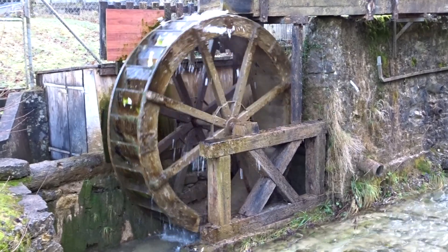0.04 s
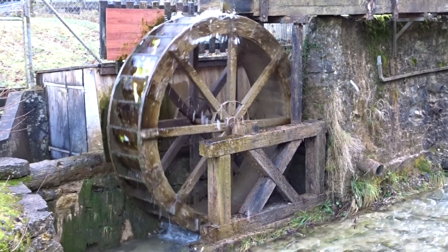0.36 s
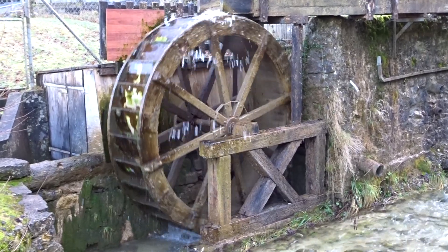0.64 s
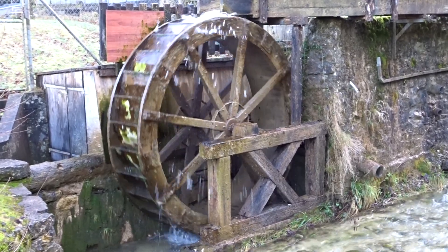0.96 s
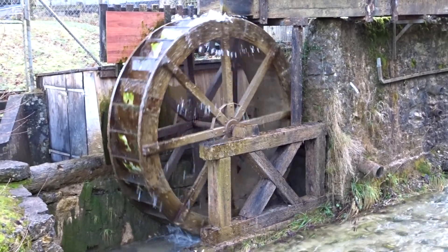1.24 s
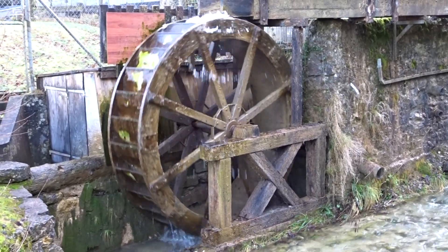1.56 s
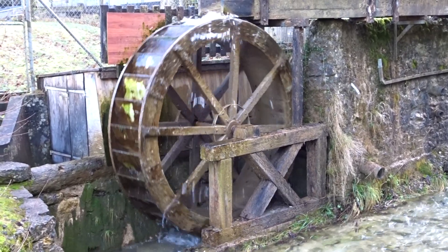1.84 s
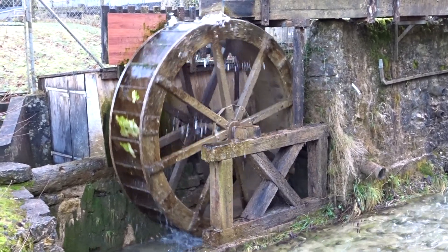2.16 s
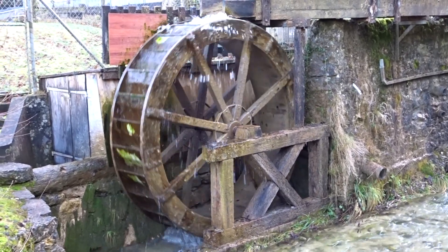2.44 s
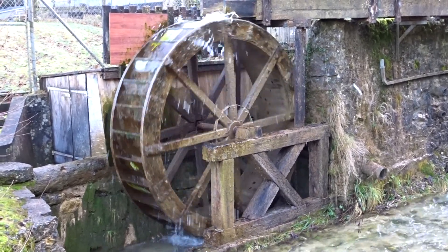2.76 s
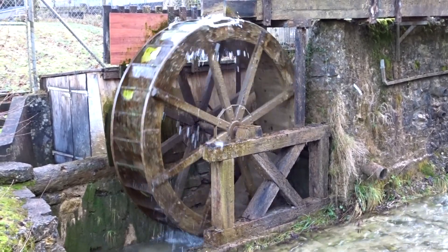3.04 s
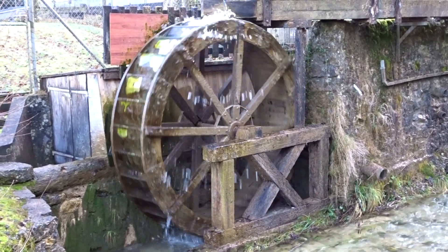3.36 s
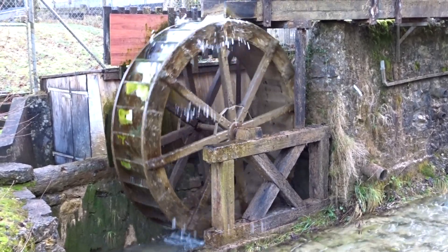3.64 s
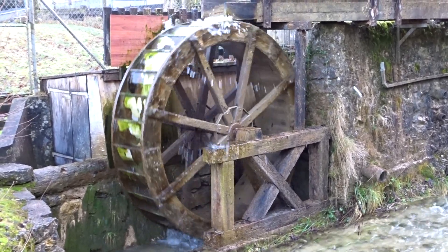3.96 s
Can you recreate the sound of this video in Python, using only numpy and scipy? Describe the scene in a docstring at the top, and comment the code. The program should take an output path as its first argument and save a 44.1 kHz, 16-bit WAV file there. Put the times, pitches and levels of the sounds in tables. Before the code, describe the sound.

A waterwheel spills water in quick, repeated splashes while a stream rushes and gurgles.

```python
"""A stream rushes steadily from the start, gurgling under a wooden waterwheel beside a stone wall.
About 4.6 times a second a bucket spills and a clump of drops spatters down, the largest
slapping on wet wood and stone or plopping as the air they trap resonates.
After each splash the wall and the wheel pit return a short echo.
Between spills, runoff patters on and stray drops plink into the pool."""
import sys
import numpy as np
from scipy import signal
from scipy.fft import rfft, irfft
from scipy.io import wavfile
from scipy.ndimage import uniform_filter1d

SR = 44100
rng = np.random.default_rng(int(sys.argv[2]) if len(sys.argv) > 2 else 0)


def unload_wav(signal):
    """Save mono or channel-first audio to the path in sys.argv[1] as 16-bit WAV at rate SR, clipped to [-1, 1]."""
    wavfile.write(
        sys.argv[1],
        SR,
        np.round(np.clip(np.atleast_2d(signal).T, -1, 1) * 32767).astype(np.int16),
    )


N = 176400

# spectrum of drop impacts: frequency_hz, gain_db
SPATTER_SPECTRUM = [(150, -29), (400, -11.5), (800, -1.5), (1600, -0.5), (2500, 1.5), (4000, -2),
                    (5500, 1.5), (7500, -3), (10000, -5), (12500, -8), (14000, -5.5), (16000, -10.5)]
STEREO_SCATTER = 0.39  # side amplitude relative to middle


def spills(gain_db=-3, release_s=0.018, plink_share=0.35, split_hz=4400):
    """Incoherent addition: each bucket's load lands as clicks and plinks whose powers sum."""
    # clumps of water, one or two per bucket: start_s, rise_s, hold_s, level_db, extra_treble_db
    clumps = [(0.095, 0.0097, .004, -17, -6), (0.271, 0.052, 0.011, -24.5, 1),
              (0.505, 0.016, 0.035, -25.5, -2), (0.72, 0.0048, 0.029, -22.5, -5),
              (0.975, 0.0065, 0.01, -19.5, 1), (1.157, 0.012, 0.041, -30, 6.5),
              (1.43, 0.014, 0.011, -27, 0), (1.490, .015, .006, -30, 4), (1.623, 0.013, 0.0072, -23, 3),
              (1.65, 0.0055, .004, -22.5, -4), (1.805, 0.0092, 0.03, -26, 0.5),
              (2.045, 0.0049, 0.0057, -31, 8), (2.064, 0.0034, 0.0048, -18.5, -2),
              (2.246, 0.024, 0.0097, -27.5, 7), (2.322, .015, .005, -34, 5),
              (2.493, 0.013, 0.011, -27.5, 9), (2.538, .005, .010, -29.5, 6.5),
              (2.68, .006, 0.016, -31.5, 7), (2.92, .004, .004, -33, 8.5), (2.934, .003, 0.0046, -21, 4.5),
              (3.127, 0.046, .008, -27.5, 3.5), (3.349, .002, 0.013, -28.5, 4),
              (3.377, .008, .010, -21.5, -1.5), (3.579, 0.021, 0.024, -21.5, -1.5),
              (3.779, .012, 0.032, -25, .5)]
    t, body_power, treble_power = np.arange(N) / SR, np.zeros(N), np.zeros(N)
    for start, rise, hold, level_db, extra_treble_db in clumps:
        attack = np.clip((t - start) / rise, 0, 1)
        envelope = attack * np.exp(-np.maximum(t - start - rise - hold, 0) / release_s)
        body_power += (amp(level_db) * envelope) ** 2
        treble_power += (amp(level_db + extra_treble_db) * envelope) ** 2
    clicks = unit(colour(impacts(per_s=5000, spread_db=2.5), SPATTER_SPECTRUM))
    spatter = np.sqrt(1 - plink_share) * clicks + np.sqrt(plink_share) * plinks(per_s=1800)
    treble = highpass(spatter, split_hz, order=1)
    return amp(gain_db) * (np.sqrt(body_power) * (spatter - treble) + np.sqrt(treble_power) * treble)


def slaps(gain_db=-1, crack_s=0.002, size=1024):
    """Impact excitation: a large drop rings a tiny bubble and cracks around the same pitch."""
    # large drops on wet wood and stone: start_s, level_db, pitch_hz, decay_cycles
    large_drops = [(.0938, -15, 5500, 2), (0.1018, -13, 4000, 2), (.1060, -11, 4000, 3.3),
                   (.2590, -22.5, 10000, 9), (.3085, -9.5, 7000, 4), (.3350, -13.5, 4750, 2.7),
                   (.7138, -11, 5800, 3), (0.7188, -13, 5400, 6), (0.729, -11, 5800, 2),
                   (.7350, -13, 3500, 3.4), (.7675, -15, 5600, 4), (0.974, -10.5, 3600, 3),
                   (1.1735, -8, 5960, 4), (1.4308, -12.5, 5170, 4.1), (1.6155, -14, 5300, 4),
                   (1.6405, -22, 3800, 2), (1.7263, -17, 6060, 4), (1.8098, -19, 5230, 3),
                   (1.8151, -11, 7500, 3), (1.8184, -5.5, 7600, 5.9), (1.8395, -12, 2360, 2.3),
                   (2.0695, -26, 2820, 2), (2.268, -16, 5770, 3), (2.2785, -26, 3100, 2),
                   (2.3430, -17, 3040, 2), (2.4580, -9.5, 3040, 1.1), (2.5062, -10, 2580, 1),
                   (2.9380, -16, 2400, 1.8), (3.0383, -21, 2800, 1.8), (3.1077, -13, 4700, 1.4),
                   (3.1982, -14, 2500, 1.7), (3.3513, -14.5, 4340, 3.5), (3.5932, -18, 3300, 2),
                   (3.7895, -6.5, 5200, 6.6), (3.7984, -14, 5500, 7)]
    t, out = np.arange(size) / SR, np.zeros((2, N))
    for start, level_db, hz, cycles in large_drops:
        band = bell_band(hz, size, octaves=0.83) + 0.1
        middle, side = unit(irfft(rfft(rng.standard_normal((2, size))) * band, size))
        ring = np.exp(-t * hz / cycles) * np.sin(2 * np.pi * hz * t)
        for channel, sign in zip(out, (1, -1)):
            crack = 0.34 * np.exp(-t / crack_s) * (middle + sign * STEREO_SCATTER * side)
            add(channel, start, amp(level_db + gain_db) * (ring + crack))
    return out


def plops(froth_s=0.013, size=2048):
    """Damped resonance: a larger air pocket knocks hollowly, then breaks into froth near its pitch."""
    # air trapped by falling water: start_s, level_db, pitch_hz
    air_pockets = [(0.1033, -13, 1450), (0.107, -15, 1190), (0.7138, -17, 1330), (0.7175, -23, 1650),
                   (0.7487, -19, 1430), (0.974, -16.5, 2100), (1.4345, -9.5, 1730), (1.4448, -19, 1610),
                   (1.6205, -15.5, 1800), (1.8390, -11.5, 1760), (2.0704, -15.5, 1760),
                   (2.2780, -14.5, 1500), (2.4594, -17.5, 1830), (2.507, -15.5, 1170),
                   (2.5185, -10.5, 1470), (2.9382, -11, 1850), (3.353, -21, 1620), (3.39, -16, 1900),
                   (3.8022, -19.5, 1850)]
    t, out = np.arange(size) / SR, np.zeros(N)
    for start, level_db, hz in air_pockets:
        band = bell_band(hz, size, octaves=0.24)
        froth = unit(irfft(rfft(rng.standard_normal(size)) * band, size)) * np.exp(-t / froth_s)
        knock = bubble(hz, swell_cycles=1.16, glide=0.027)
        add(out, start, amp(level_db) * (knock + 0.22 * froth))
    return out


def plinks(per_s, low_hz=1410, high_hz=10800, pitches=20):
    """Bubble resonance: each drop rings a tiny bubble at its own natural frequency."""
    out = np.zeros((2, N))
    for hz in np.geomspace(low_hz, high_hz, pitches):
        ring = bubble(hz, swell_cycles=0.95, glide=0.02) * hz ** 0.23  # higher plinks peak louder
        out += convolve(impacts(per_s / pitches, spread_db=5.5), ring)
    return unit(out)


def bubble(hz, swell_cycles, glide):
    """Damped oscillator: a pocket of air swells, rings for a few cycles and rises in pitch."""
    age = np.arange(2048) / SR * hz / swell_cycles  # 1 at the envelope's peak
    phase = 2 * np.pi * swell_cycles * age * (1 + glide * np.minimum(age, 10) / 2)
    return age * np.exp(1 - age) * np.sin(phase)


def drips(gain_db=-41.5):
    """Shot noise: water running off the rim and spokes merges into an unbroken patter."""
    return amp(gain_db) * unit(colour(impacts(per_s=4000, spread_db=2.5), SPATTER_SPECTRUM))


def strays(gain_db=-48.5):
    """Air entrainment: single drops fall into the pool throughout, each ringing a bubble."""
    return amp(gain_db) * plinks(per_s=500)


def echo(x, gain_db=-7.5, spacing=20):
    """Reverberation: sparse reflections from wall and pit decay, lasting longest in the midrange."""
    # reverberation time: frequency_hz, t60_s
    decay_times = [(300, 0.15), (1500, 0.49), (5000, 0.28), (14000, 0.23)]
    slots = np.arange(6 * spacing, SR // 2, spacing)
    arrivals = slots + rng.integers(0, spacing, (2, len(slots)))
    taps = np.zeros((2, SR))
    np.put_along_axis(taps, arrivals, rng.choice([-1., 1.], arrivals.shape), 1)
    hz, t, spectra = signal.stft(taps + 0.14 * taps[::-1], SR, nperseg=256)
    decay = amp(-60 * t / curve_at(decay_times, hz)[:, None])
    tail = signal.istft(spectra * decay, SR, nperseg=256)[1]
    return amp(gain_db) * signal.fftconvolve(x, tail / np.linalg.norm(tail[0]), axes=1)[:, :N]


def gurgle(level_db=-36, per_s=600, low_hz=724.5, high_hz=1938, pitches=36):
    """Free oscillation: small bubbles pinch off in the churn under the wheel, ring and die."""
    t, out = np.arange(2048) / SR, np.zeros((2, N))
    for hz in np.geomspace(low_hz, high_hz, pitches):
        decay_cycles = 7.6 * rng.uniform(0.26, 2.5)
        ring = np.exp(-t * hz / decay_cycles) * np.sin(2 * np.pi * hz * t * (1 + 2 * t))
        out += convolve(impacts(per_s / pitches, spread_db=1.5), unit(ring))
    narrowed = out + 0.47 * out[::-1]
    return amp(level_db) * unit(highpass(narrowed, hz=590, order=4))


def rush(level_db=-28, patch_db=0.4, flicker_db=0.9):
    """Superposition: the stream's far splashes sum to wide noise with drifting patches and flicker."""
    # spectrum of the stream: frequency_hz, density_db
    stream_spectrum = [(18, -74), (30, -57), (149, -23), (364, -7.5), (554, -6.5), (937, 0), (1430, -3),
                       (1720, -1.5), (2750, -8), (7270, -16.5), (12300, -24), (14000, -22.5), (16000, -31)]
    # likeness of left and right: frequency_hz, coherence_ratio
    stream_coherence = [(60, .99), (270, 1), (740, 0.97), (1220, 0.89), (2000, 0.63), (3300, 0.33),
                        (5500, 0), (9000, 0.38), (15000, 0.5)]
    frames, hz = N // 256 + 5, np.fft.rfftfreq(1024, 1 / SR)
    left_re, left_im, other_re, other_im, patches = rng.standard_normal((frames, 513, 5)).T
    patches = uniform_filter1d(patches, size=9, axis=0)  # smooth across frequency
    patches = unit(uniform_filter1d(patches, size=8, axis=1))  # and across time
    flicker = rng.standard_normal(frames)
    coherence = np.clip(curve_at(stream_coherence, hz), 0, 1)[:, None]
    left = left_re + 1j * left_im
    right = coherence * left + np.sqrt(1 - coherence ** 2) * (other_re + 1j * other_im)
    gain = amp(curve_at(stream_spectrum, hz)[:, None] + patch_db * patches + flicker_db * flicker)
    wash = signal.istft(np.array([left, right]) * gain, nperseg=1024, noverlap=768)[1]
    return amp(level_db) * unit(wash[:, :N])


def impacts(per_s, spread_db):
    """Poisson process: random impulses of uneven size, scattered between left and right."""
    strength = amp(spread_db * np.minimum(rng.exponential(1, N), 4))
    hits = rng.random(N) < per_s / SR
    middle, side = rng.choice([-1., 1.], N), STEREO_SCATTER * rng.standard_normal(N)
    return strength * hits * np.array([middle + side, middle - side])


def colour(x, spectrum):
    """Minimum-phase filtering: clicks take on a spectrum and keep their sharp front."""
    log_gain = np.log(amp(curve_at(spectrum, abs(np.fft.fftfreq(2048, 1 / SR)))))
    response = np.exp(np.conj(signal.hilbert(log_gain)))
    return convolve(x, np.fft.ifft(response).real)


def convolve(x, response):
    """Linear response: every impulse in either channel sets off a scaled copy of the response."""
    return signal.oaconvolve(x, response[None], axes=1)[:, :N]


def bell_band(hz, size, octaves):
    """Band-pass gain: a bell curve in log frequency around a pitch."""
    bins_hz = np.fft.rfftfreq(size, 1 / SR)
    return np.exp(-.5 * (np.log2((bins_hz + 1) / hz) / octaves) ** 2)


def highpass(x, hz, order):
    """Roll-off below a cutoff, 6 dB per octave for each order."""
    return signal.sosfilt(signal.butter(order, hz, "highpass", fs=SR, output="sos"), x)


def curve_at(points, hz):
    """Interpolation along a log-frequency axis."""
    points_hz, values = np.transpose(points)
    return np.interp(np.log(hz + 1), np.log(points_hz + 1), values)


def add(mix, start_s, sound):
    """Superposition of a sound on the mix at a given time."""
    part = mix[max(round(start_s * SR), 0):][:len(sound)]
    part += sound[:len(part)]


def amp(db):
    """Decibels to amplitude ratio."""
    return 10 ** (np.asarray(db) / 20)


def unit(x):
    """Normalisation to rms 1."""
    return x / np.sqrt(np.mean(x ** 2) + 1e-20)


def scene():
    """Superposition: the wheel's splashes, too small to radiate bass, their echo and the stream."""
    wheel = highpass(spills() + slaps() + plops() + drips() + strays(), hz=590, order=3)
    return wheel + echo(wheel) + rush() + gurgle()


def record(dry, cutoff_hz=15950):
    """Stereo pickup: two close microphone ports differ in level and phase; a low-pass limits the band."""
    # level between the ports: frequency_hz, left_minus_right_db
    balance = [(200, 0.5), (500, 1.1), (800, 1.1), (1200, 1), (1800, 4), (2700, 2.4), (4200, -6.5),
               (6400, 1.5), (9800, 1.8), (15000, -0.5)]
    # phase between the ports: frequency_hz, left_lead_rad
    phase_lead = [(300, -0.054), (1200, 0.24), (2000, -0.48), (2600, -0.88), (4200, -0.086), (5000, 1.84),
                  (6500, 0.58), (8200, -0.34), (12000, -1.2), (15000, .3)]
    hz, side = np.fft.rfftfreq(N, 1 / SR), np.array([[.5], [-.5]])
    ports = amp(side * curve_at(balance, hz)) * np.exp(1j * side * curve_at(phase_lead, hz))
    heard = irfft(rfft(dry) * ports, N)
    lowpass = signal.firwin(611, cutoff_hz, window=("kaiser", 9), fs=SR)
    return signal.oaconvolve(heard, lowpass[None], "same")


dry = scene()
out = record(dry)
unload_wav(out)
```